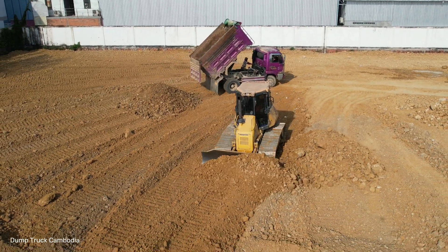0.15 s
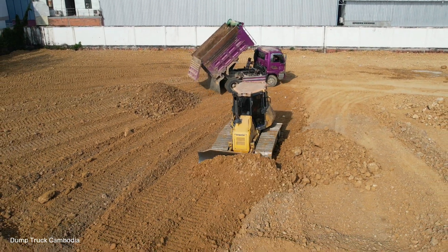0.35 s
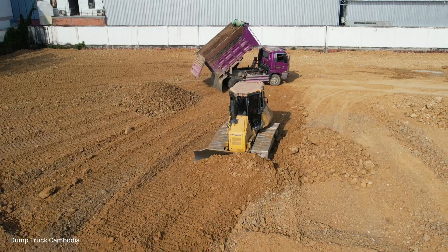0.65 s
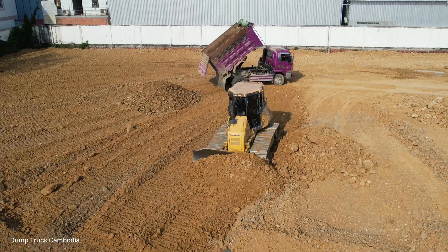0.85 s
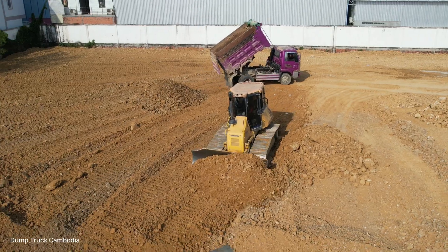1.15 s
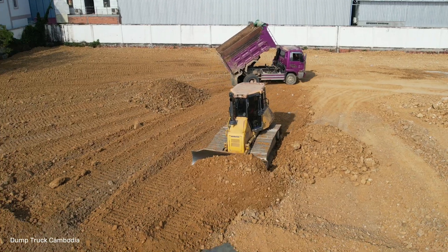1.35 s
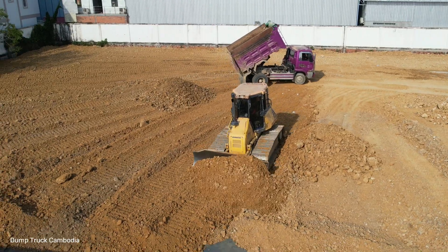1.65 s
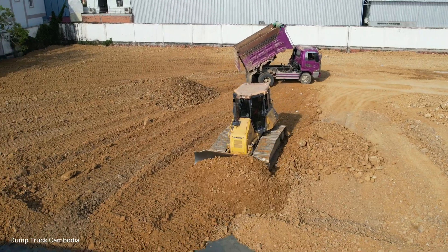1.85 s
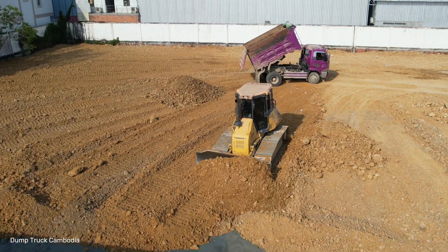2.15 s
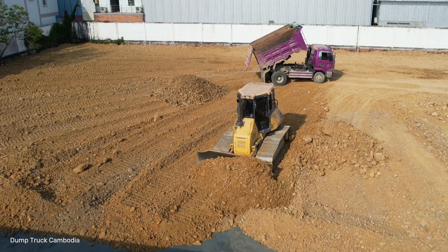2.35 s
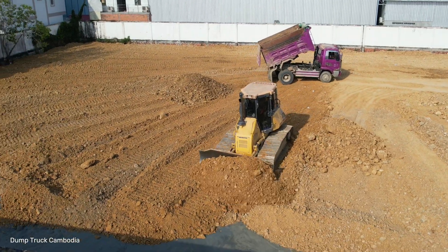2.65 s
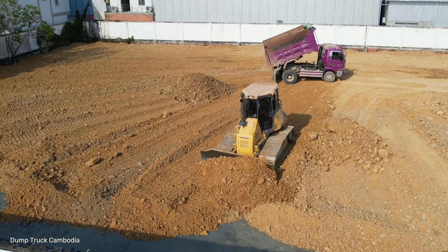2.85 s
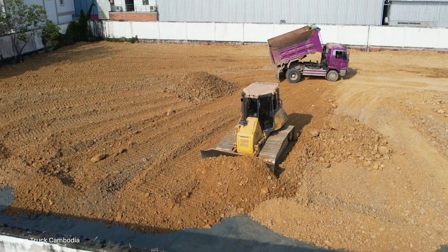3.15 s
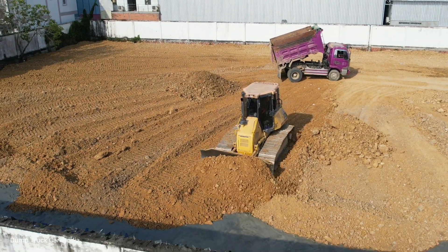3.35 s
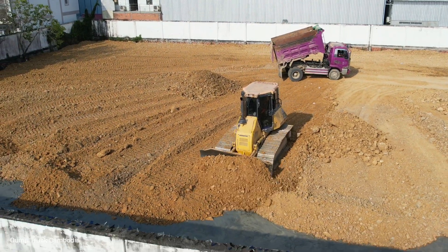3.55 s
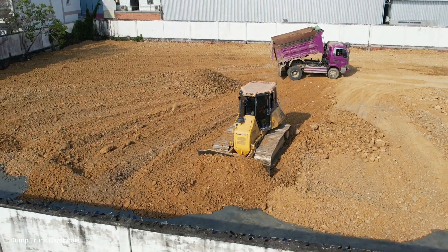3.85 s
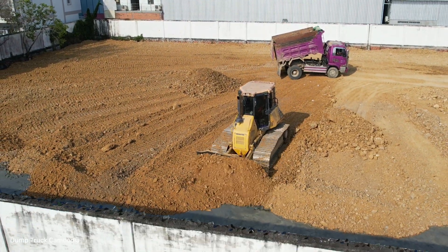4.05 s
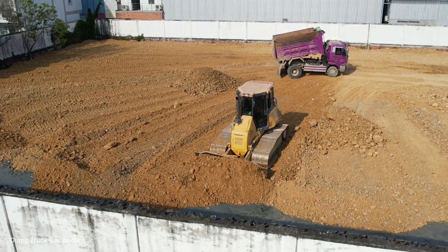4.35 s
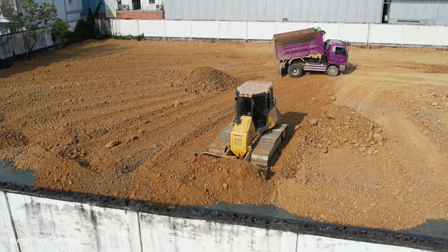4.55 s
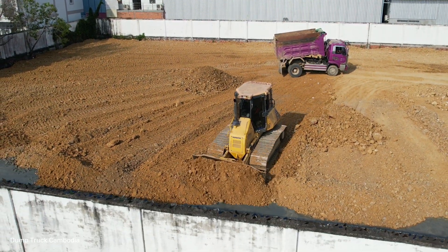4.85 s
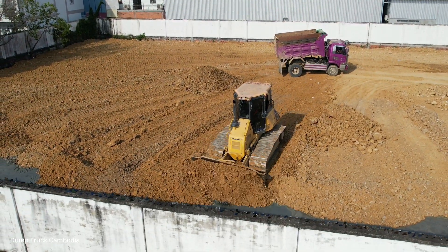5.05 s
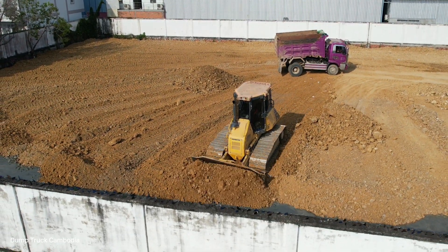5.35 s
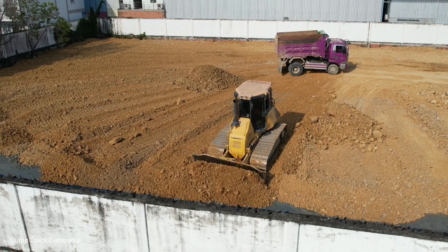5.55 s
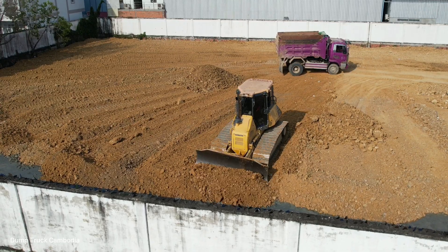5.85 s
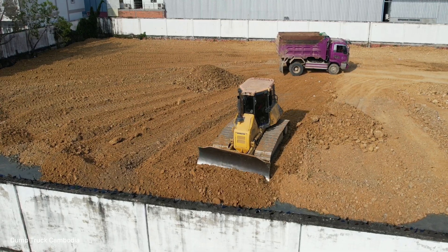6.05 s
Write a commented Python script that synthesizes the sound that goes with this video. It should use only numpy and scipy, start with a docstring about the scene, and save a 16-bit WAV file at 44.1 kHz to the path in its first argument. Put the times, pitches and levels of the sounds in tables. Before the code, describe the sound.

Deep diesel engines drone steadily under a hydraulic hum, with short, high metallic squeals from a bulldozer's tracks.

```python
"""A deep engine drone swells and fades as a bulldozer shoves soil closer and a dump truck drives off.
The two firing tones beat; a hydraulic pump hums, and exhausts, fan and block roar through sheet-metal
resonances. Dry track pins squeal by stick-slip friction among brief high chirps and short squeaks; the
blade linkage rattles as it lifts, and stones ping off the steel. These bright sounds echo in the yard."""
import sys
import numpy as np
from scipy import signal
from scipy.fft import rfft, irfft, next_fast_len
from scipy.io import wavfile
from scipy.ndimage import uniform_filter1d

SR = 44100
rng = np.random.default_rng(int(sys.argv[2]) if len(sys.argv) > 2 else 0)


def wrap_up_sound(samples):
    """Save the sound to the file named by the first command line argument, as 16-bit audio."""
    columns = np.atleast_2d(samples).T
    # keep every value between -1 and 1, then stretch to whole-number steps
    tamed = np.clip(columns, -1, 1)
    steps = np.round(tamed * 32767).astype(np.int16)
    wavfile.write(sys.argv[1], SR, steps)


N = 274302


# firing rate of the louder engine and phase lag of the other: t/s, f/Hz, lag/cycles
FIRING_CURVE = [(0, 94.4, 0.13), (.4, 94, .32), (1.0, 93.6, 0.49), (1.6, 93.6, 0.72), (2.0, 93.4, 0.89),
                (2.35, 93.6, 1.0), (2.75, 93.6, 1.23), (3.2, 93.0, 1.41), (3.8, 93.4, 1.55),
                (4.5, 93.5, 1.76), (4.95, 93.6, 1.97), (5.2, 93.5, 2.17), (5.55, 93.2, 2.17),
                (5.85, 94.3, 2.42), (6.22, 94.8, 2.7)]
# partials of uneven cylinders and overtones: multiple of the firing rate, level/dB, waver/dB
ENGINE_ORDERS = [(.5, -40.5, 4.5), (1.5, -37, 4), (2, -41.5, 1)]

def engine_drone(start_db=-22.5, second_engine_db=-3, nearing_db_per_s=0.3654):
    """Beating: two close firing tones interfere, and are weakest where the lag is a whole cycle."""
    hz, lag = curves(FIRING_CURVE)
    phase = 2 * np.pi * (np.cumsum(hz) / SR + rng.random())
    db = start_db + nearing_db_per_s * np.arange(N) / SR + .6 * waver(12)
    second_engine = undb(second_engine_db) * np.sin(phase - 2 * np.pi * lag)
    out = undb(db) * np.sqrt(2) * (np.sin(phase) - second_engine)
    for k, order_db, waver_db in ENGINE_ORDERS:
        out += undb(order_db + waver_db * waver(5.07)) * tone(k * hz * (1 + .012 * waver(8)))
    return out


# pump hum, its overtones rising as the machine nears: t/s, fundamental level/dB, overtone gain/dB
PUMP_CURVE = [(0, -25, -10), (.8, -28.5, -4), (1.3, -25.5, -1), (1.75, -27.5, -2), (2.25, -24, -1),
              (3.7, -27, 0.7), (4.7, -22.5, 0.2), (6.22, -24, 0.8)]
# pump overtones: harmonic number, level/dB before that gain
PUMP_HARMONICS = [(2, -55.5), (3, -49.5), (4, -53.5), (5, -54), (6, -52.5)]

def hydraulic_pump(piston_hz=256.14):
    """Periodic excitation: piston pulses give a harmonic series, here a hum with thin overtones."""
    db, overtone_db = curves(PUMP_CURVE)
    hz = piston_hz * (1 + 0.00162 * waver(14) + .0015 * waver(3))
    out = undb(db + 0.88 * waver(13)) * tone(hz)
    for k, harmonic_db in PUMP_HARMONICS:
        out += undb(harmonic_db + overtone_db + 2.0 * waver(10)) * tone(k * hz)
    return out


# noise spectrum of exhausts, fan and block: f/Hz, relative level/dB
ROAR_SPECTRUM = [(18, -21), (30, -4), (60, -3), (80, -7), (150, -0.5), (240, -9), (320, -10), (355, -20),
                 (620, -16), (1700, -20.5), (2300, -32), (4000, -33), (6500, -44.5), (9500, -52),
                 (15500, -70.5)]
# panel resonances and ground-echo dips: f/Hz, width/Hz, gain/dB
PEAKS_AND_DIPS = [(295, 26, 2.5), (411, 44, 3), (559, 13, 4), (586, 8.1, -6.5), (623, 34, 3), (742, 40, -4),
                  (930, 30, -0.5), (1186, 28, -6), (1128, 138, 5.5), (1336, 46, -8.5), (1380, 78, 6.5),
                  (2290, 46, 0.5), (2980, 47, -6), (3300, 61, 0.5), (3850, 80, -4.5), (4320, 150, -5),
                  (10500, 300, -4), (2160, 103, 8), (2536, 120, 6), (3063, 79, 7), (3585, 81, 9),
                  (3900, 200, 3), (4790, 220, -3.5), (5520, 300, 5), (6020, 140, 3.5), (8030, 990, -4.5),
                  (9660, 300, 3), (11000, 300, 0.5)]
# working load: t/s, exhaust rumble gain/dB, block clatter gain/dB, sliding soil gain/dB
LOAD_CURVE = [(0, 2.5, 1.5, 2.5), (1.2, 0.5, -1, 0.5), (2, 4.5, -.5, 1.5), (2.5, 3, -1, 3),
              (3.4, 1.5, 0, 0), (4.5, 2.5, -1, 0.5), (5.1, 3, 2.5, 0), (5.7, 2, -1, -0.5), (6.22, 1, -2, 2)]

def machine_roar(base_db=-29):
    """Source and filter: resonances colour broadband noise, whose octave bands sway with the load."""
    size, hz = frequency_grid()
    corner_hz, corner_db = np.transpose(ROAR_SPECTRUM)
    db = np.interp(np.log(hz), np.log(corner_hz), corner_db, left=-60)
    db += sum(gain_db / peak_falloff(hz, f, width) for f, width, gain_db in PEAKS_AND_DIPS)
    spectrum = rfft(rng.standard_normal(size)) * undb(db)
    spectrum *= undb(base_db) / irfft(spectrum, size).std()
    rumble_db, clatter_db, soil_db = curves(LOAD_CURVE)
    crunch_db = 0.68 * waver(25)  # clods break unevenly
    throb_db = 0.23 * tone(curves(FIRING_CURVE)[0] / 2)  # every other firing is stronger
    out = 0
    for centre_hz in 32 * 2. ** np.arange(10):
        octaves = np.clip(np.log2(hz / centre_hz), -1, 1)
        band = irfft(spectrum * np.cos(np.pi / 2 * octaves) ** 2, size)[:N]
        block_share = np.clip(np.log2(centre_hz / 300) / 2, 0, 1)
        soil_share = np.clip(np.log2(centre_hz / 1500) / 2, 0, 1)  # soil hisses in the treble
        sway_db = (1 - block_share) * (rumble_db + 1.45 * waver(3.96))
        sway_db += block_share * (clatter_db + throb_db + 0.74 * waver(14))
        sway_db += soil_share * (soil_db + crunch_db)
        out += undb(sway_db) * band
    return out


# dry track pins: t/s, duration/s, f/Hz, level/dB, rasp/dB relative to the tone
PIN_SQUEALS = [(0.934, .035, 5280, -54, -1), (0.996, .034, 5470, -38.5, -3.5), (1.038, 0.03, 5600, -50, -4),
               (2.364, .016, 5370, -47.5, -2), (2.531, .065, 5550, -41.5, -13), (2.673, .05, 5510, -48, 2),
               (2.728, .031, 5470, -41.5, -7), (2.767, .022, 5504, -41, -5), (2.798, 0.023, 5375, -49, -3),
               (2.825, .03, 5420, -49, -4), (2.875, 0.038, 5450, -56, -6), (3.787, 0.052, 5485, -36.5, -12),
               (3.857, .034, 5400, -52, -6), (3.956, 0.041, 5410, -49.5, -7),
               (4.255, 0.035, 5350, -51, -10), (4.595, 0.053, 3623, -37, -18),
               (4.684, .033, 3605, -40, -10), (4.72, 0.053, 3610, -49, -7), (4.872, .039, 3440, -50, -4),
               (4.895, 0.051, 3850, -56, -6), (4.93, .08, 3400, -53, -4), (4.945, 0.023, 3250, -47, -3),
               (5.009, 0.036, 3250, -49, -3), (5.034, 0.038, 5420, -39, -11),
               (5.077, 0.045, 5480, -38.5, -11), (5.122, .04, 5345, -44, -2), (5.166, 0.073, 5470, -52, -3),
               (5.315, 0.047, 5470, -33, -13), (5.362, .03, 5535, -48, -8), (5.536, .065, 5525, -46, -10),
               (5.635, 0.033, 5440, -50, -2), (5.689, .05, 5450, -56, -7)]

def track_squeals(rise_hz_per_s=1200, rasp_width_hz=300, creak_db=-63.5, creak_s=.09):
    """Stick-slip friction: each tone climbs as the pin grips, stutters, rasps and creaks out faintly."""
    out, t = 0, np.arange(N) / SR
    stutter = undb(1.8 * waver(70))
    slips = shaped_noise(lambda hz: 1 / (1 + (2 * hz / rasp_width_hz) ** 4))
    creak = undb(creak_db + 2.5 * waver(30)) * (1 + .7 * slips)
    for start, length, mid_hz, db, rasp_db in PIN_SQUEALS:
        hz = mid_hz + rise_hz_per_s * (np.clip(t - start, 0, length) - length / 2)
        pin = tone(hz)
        octave = undb(-72.5 + 0.66 * (db + 45.5)) * tone(2 * hz)  # grows less than the fundamental
        rasp = 1 + undb(rasp_db) * slips  # modulation puts noise sidebands beside the tone
        out += gate(start, length, edge_s=.013) * (undb(db) * pin + octave) * rasp
        out += gate(start + length, creak_s, edge_s=.03) * creak * pin
    return stutter * out


# brief high chirps and short track squeaks: t/s, duration/s, f/Hz, level/dB
CHIRPS_AND_SQUEAKS = [(1.395, 0.028, 6900, -56), (1.461, .042, 6950, -59), (1.57, .04, 13700, -72),
                      (1.575, .2, 12750, -80), (2.026, .02, 14200, -73), (1.915, .02, 3710, -45),
                      (2.35, .021, 3750, -43.5), (3.308, .074, 13080, -71), (4.213, 0.018, 4000, -45),
                      (5.255, .031, 6470, -56), (5.29, .036, 6710, -53), (5.455, .062, 9500, -64),
                      (5.58, .025, 8740, -64), (5.699, 0.033, 6700, -58), (6.048, 0.018, 4150, -53),
                      (6.09, .015, 4500, -49)]

def chirps_and_squeaks():
    """Random modulation: fast flutter of pitch and level roughens each brief, high tone."""
    flutter = 1 + .003 * waver(150)
    out = 0
    for start, length, hz, db in CHIRPS_AND_SQUEAKS:
        out += undb(db) * gate(start, length, edge_s=.006) * tone(hz * flutter)
    return out * undb(2.4 * waver(120))


# rattles of the blade linkage: t/s, duration/s, level/dB, tilt/(dB per octave)
RATTLE_BURSTS = [(3.31, 0.012, -57, 3), (5.3, .03, -58, 0), (5.59, 0.031, -62, 1), (5.831, .03, -55, 0),
                 (5.865, 0.011, -51, -4), (5.892, .014, -51, -5), (5.944, 0.026, -51.5, -6.5),
                 (5.98, .012, -51, -7), (6.008, .012, -54, 0), (6.045, 0.021, -58, -4),
                 (6.075, .03, -61, 8), (6.168, .012, -60, 10)]
# its modes: f/Hz, width/Hz, relative level/dB
LINKAGE_MODES = [(6700, 200, -3.5), (7070, 200, 0), (8070, 200, 2), (8600, 200, -3), (10000, 250, -4.5),
                 (11400, 400, -9), (12300, 300, -16), (13300, 400, -15), (14300, 400, -14),
                 (15540, 400, -18)]

def linkage_rattles():
    """Modal excitation: dense tiny knocks act as noise, and each burst favours different modes."""
    out, chatter = 0, undb(4.5 * waver(200))
    for start, length, db, tilt_db in RATTLE_BURSTS:
        modes = [(f, width, undb(mode_db + rng.normal(0, 3))) for f, width, mode_db in LINKAGE_MODES]

        def response(hz):
            peaks = sum(gain / peak_falloff(hz, f, width) for f, width, gain in modes)
            return undb(tilt_db * np.log2(hz / 8000)) * peaks

        out += undb(db) * gate(start, length, edge_s=.013) * shaped_noise(response)
    return chatter * out


def stone_pings(per_s=200, base_db=-67, low_hz=2500, high_hz=15000):
    """Damped free vibration: stones strike blade and tracks at random, louder as the soil spills."""
    t = np.arange(2048) / SR
    out = np.zeros(N + len(t))
    soil_db = curves(LOAD_CURVE)[2]
    for when, pitch, size, ring in rng.random((int(per_s * N / SR), 4)):
        i = int(when * N)
        hz = low_hz * (high_hz / low_hz) ** pitch
        db = base_db - 22 * pitch - 2 * np.log(1 - size) + 1.5 * soil_db[i]  # high pings are fainter
        decay_s = 0.005 + 0.023 * ring
        out[i:i + len(t)] += undb(db) * np.sin(2 * np.pi * hz * t) * np.exp(-t / decay_s)
    return out[:N]


def yard_echoes(x, t60_s=0.13, echo_db=-7):
    """Diffuse reflection: machine, ground and walls add a short, exponentially decaying tail."""
    t = np.arange(SR // 2) / SR
    tail = rng.standard_normal(len(t)) * undb(-60 * t / t60_s) * (t > .006)
    return x + undb(echo_db) * signal.fftconvolve(x, tail / np.linalg.norm(tail))[:N]


def undb(db):
    """Amplitude ratio of a level in dB."""
    return 10 ** (np.asarray(db) / 20)


def curves(table):
    """Linear interpolation of each column over time, one value a sample."""
    times, *columns = np.transpose(table)
    return [np.interp(np.arange(N) / SR, times, column) for column in columns]


def waver(rate_hz):
    """Slow noise of standard deviation 1: random steps, smoothed twice."""
    hold = int(SR / rate_hz)
    steps = np.repeat(rng.standard_normal(N // hold + 1), hold)
    smooth = uniform_filter1d(uniform_filter1d(steps, hold), hold)[:N]
    return smooth / smooth.std()


def gate(start, length, edge_s):
    """Envelope that opens in half of edge_s, sags by 4 dB and closes in edge_s."""
    t = np.arange(N) / SR - start
    sag = undb(-4 * np.clip(t / length, 0, 1))
    return np.clip(np.minimum(2 * t, length - t) / edge_s + .5, 0, 1) * sag


def tone(hz):
    """Sine of rms 1 whose phase is the integral of a moving frequency."""
    return np.sqrt(2) * np.sin(2 * np.pi * (np.cumsum(hz) / SR + rng.random()))


def peak_falloff(hz, centre, width):
    """Denominator of a Lorentzian peak: 1 at the centre, 2 at half a width away."""
    return 1 + (2 * (hz - centre) / width) ** 2


def frequency_grid():
    """Fourier transform size and its bin frequencies, floored at 1 Hz."""
    size = next_fast_len(N)
    return size, np.maximum(np.arange(size // 2 + 1) * SR / size, 1)


def shaped_noise(response):
    """Noise of rms 1 with the amplitude spectrum response(hz)."""
    size, hz = frequency_grid()
    noise = irfft(rfft(rng.standard_normal(size)) * response(hz), size)[:N]
    return noise / noise.std()


def scene():
    """Superposition: all sources add at one point on the yard wall; only the bright sounds echo."""
    machines = engine_drone() + hydraulic_pump() + machine_roar()
    bright = track_squeals() + chirps_and_squeaks() + stone_pings() + linkage_rattles()
    return (machines + yard_echoes(bright))[None, :]


def record(dry, cutoff_hz=15720):
    """Band limiting: a steep elliptic low-pass removes the highest treble."""
    return signal.sosfilt(signal.ellip(16, .2, 60, cutoff_hz, fs=SR, output="sos"), dry)


dry = scene()
out = record(dry)
wrap_up_sound(out)
```